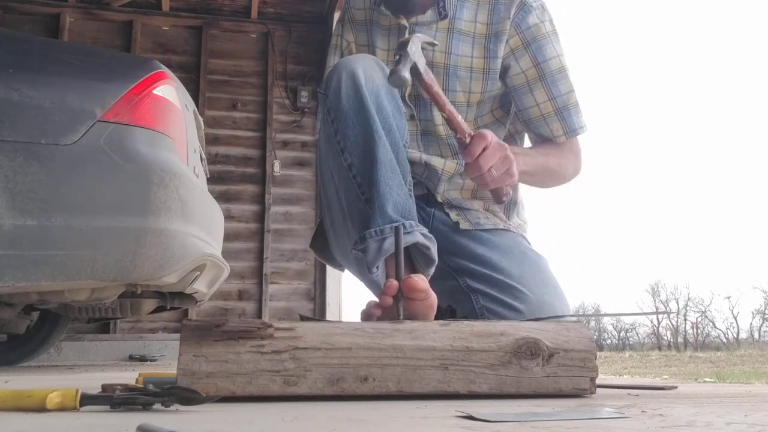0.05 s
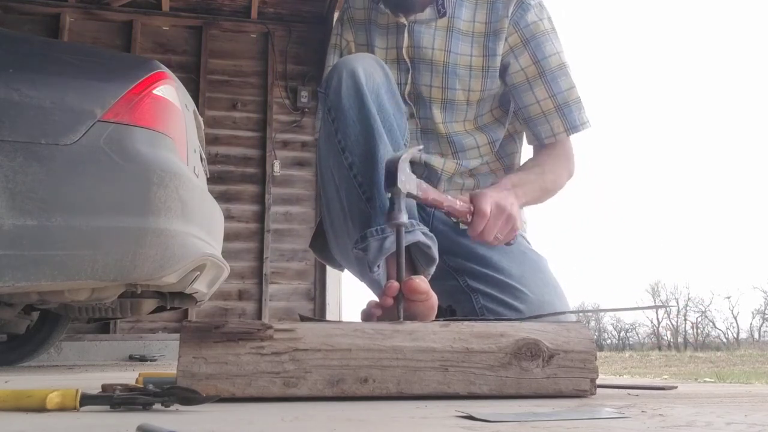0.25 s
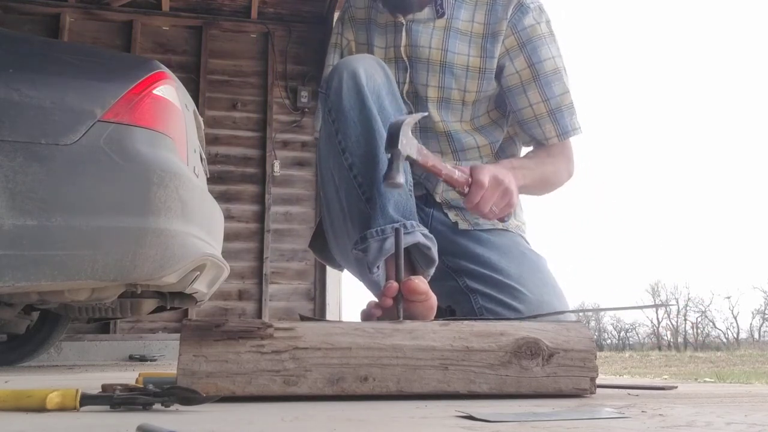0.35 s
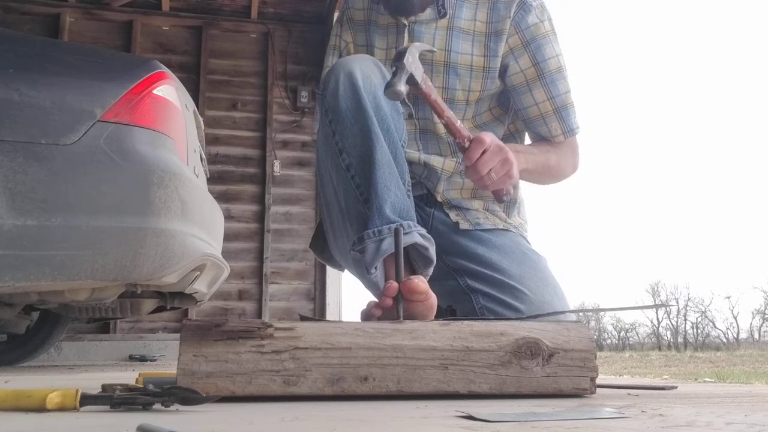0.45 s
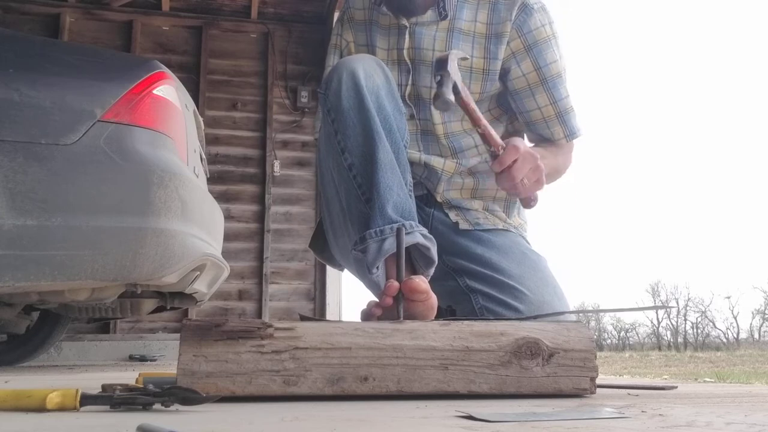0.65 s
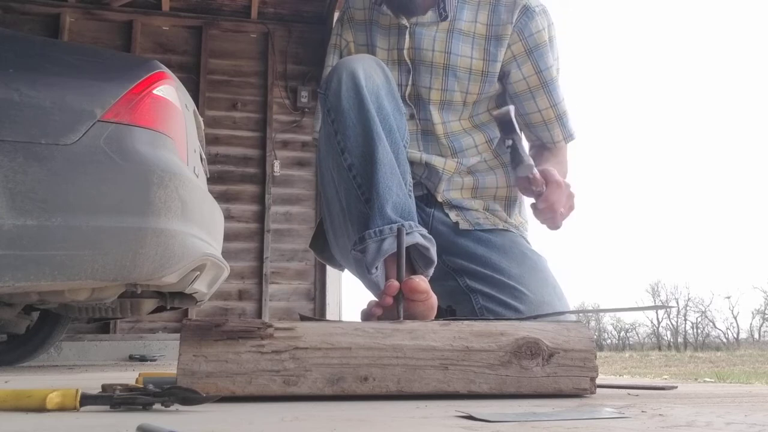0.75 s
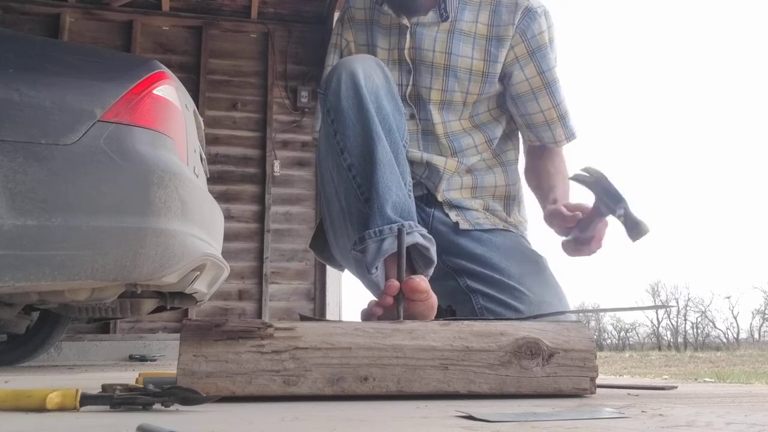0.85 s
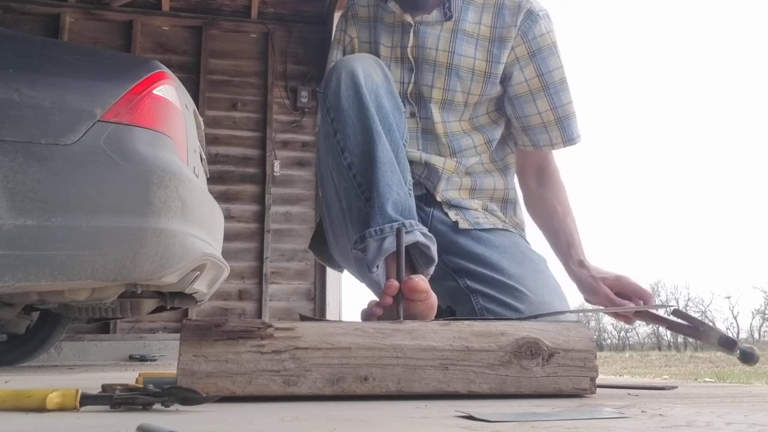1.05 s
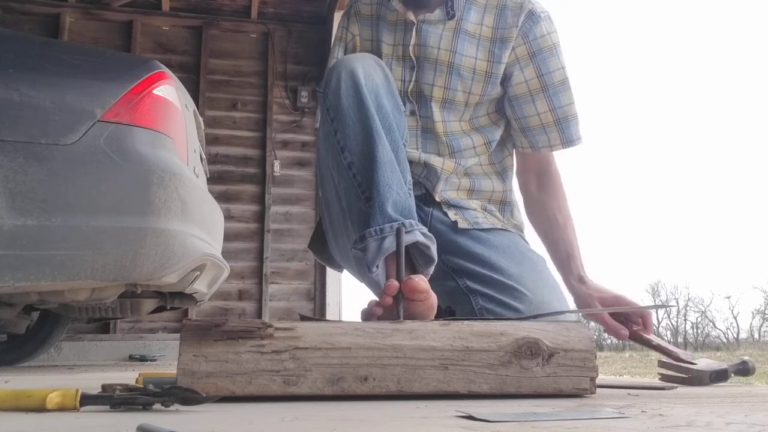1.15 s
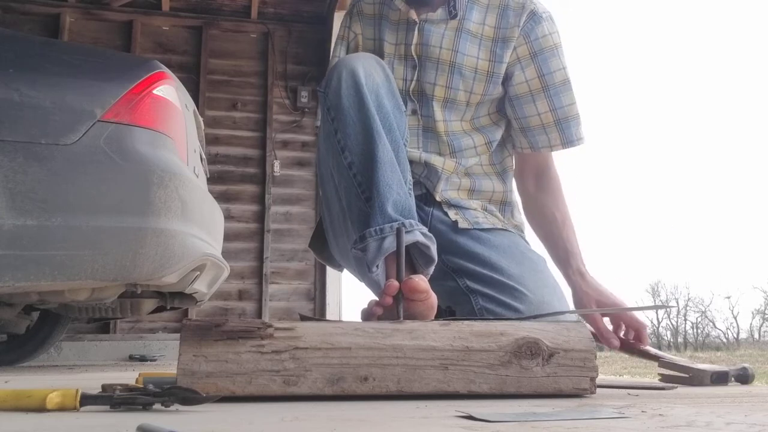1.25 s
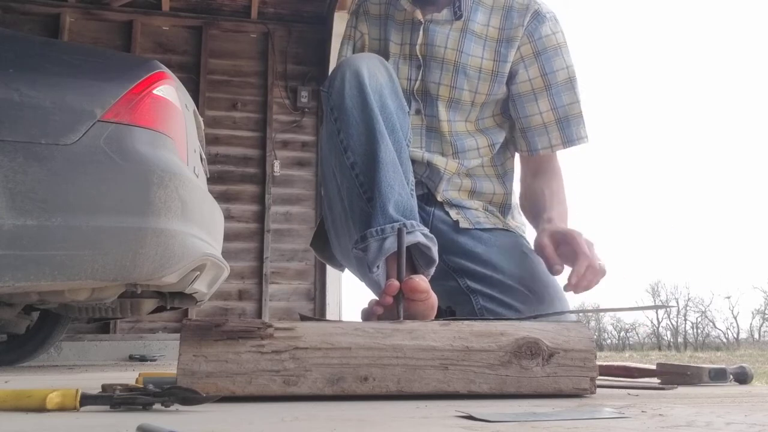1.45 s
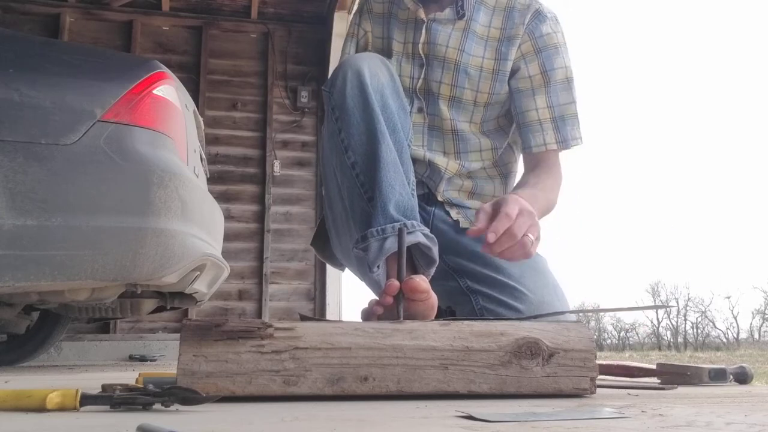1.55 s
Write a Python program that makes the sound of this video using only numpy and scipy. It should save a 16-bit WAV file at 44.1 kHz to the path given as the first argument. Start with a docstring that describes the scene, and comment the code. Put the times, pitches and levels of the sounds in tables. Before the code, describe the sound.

A hammer cracks sharply on a steel punch, rings briefly, then clanks down on concrete.

```python
"""The tail of one hammer blow dies over a low wavering hum; then a second blow cracks on a steel punch.
The punch stands on a thin plate over a timber: contact pulses excite steel modes, and shaped noise is
the reverberation of an open wooden garage. One high sine lingers as a thin ring.
Then the hammer is laid on the concrete floor, where it clanks and rocks to rest: a series of contacts,
each mixing dull knock, clank, head ring and tick. Rumble and hiss are noise; the hum is two sines."""
import sys
import numpy as np
from scipy import signal
from scipy.fft import rfft, irfft
from scipy.io import wavfile

SR = 44100
rng = np.random.default_rng(int(sys.argv[2]) if len(sys.argv) > 2 else 0)


def output_pcm(signal):
    """Save a mono or channel-first signal as 16-bit PCM at the path in sys.argv[1].

    Samples are clipped to [-1, 1] before scaling.
    """
    pcm = np.clip(np.atleast_2d(signal).T, -1, 1) * 32767
    wavfile.write(sys.argv[1], SR, np.round(pcm).astype(np.int16))


N = 70560  # 1.6 s


def undb(db):
    """Decibels to gain."""
    return 10 ** (np.asarray(db) / 20)


def unit(x):
    """Scale to unit energy per channel."""
    return x / np.sqrt(np.sum(x ** 2, axis=-1, keepdims=True))


def over_hz(hz, points):
    """Read a table on a log-frequency axis."""
    f, v = np.array(points, float).T
    return np.interp(np.log(hz + 1e-9), np.log(f), v)


def over_time(rows):
    """Each column of a curve table, sample by sample."""
    rows = np.array(rows, float)
    t = np.arange(N) / SR
    return [np.interp(t, rows[:, 0], column) for column in rows.T[1:]]


def click(spectrum):
    """Minimum-phase pulse: its energy comes as early as the given spectrum allows."""
    size = 4096
    cepstrum = irfft(np.log(undb(over_hz(np.fft.rfftfreq(size, 1 / SR), spectrum))))
    # Fold the second half onto the first, so nothing sounds before the contact
    cepstrum[1:size // 2] *= 2
    cepstrum[size // 2 + 1:] = 0
    return irfft(np.exp(rfft(cepstrum)))


def through(x, response):
    """Pass a sound through a response by convolution."""
    return signal.fftconvolve(np.atleast_2d(x), np.atleast_2d(response), axes=-1)[:, :N]


def later(x, s, size=N):
    """Place a sound at time s in a silence; a negative time leaves only its tail."""
    k = int(round(s * SR))
    padded = np.pad(np.atleast_2d(x), ((0, 0), (max(k, 0), size)))
    return padded[:, max(-k, 0):][:, :size]


RESPONSE_S = 0.9  # length of every ring and room response


def age():
    """Seconds since a contact, for as long as anything rings."""
    return np.arange(int(RESPONSE_S * SR)) / SR


def crack(spectrum):
    """A contact pulse with unit energy."""
    return unit(later(click(spectrum), 0, size=len(age()))[0])


def ring(modes, rise_s):
    """Struck modes decay exponentially, alternating in sign, with unit energy in all."""
    t = age()
    out = 0
    for k, (hz, db, t60) in enumerate(modes):
        mode = np.cos(2 * np.pi * hz * t) * np.exp(-np.log(1000) * t / t60)
        out = out + (-1) ** k * undb(db) * unit(mode)
    return unit(out * (1 - np.exp(-t / rise_s)))


# Likeness of left and right. Each row: frequency in Hz, correlation from 0 to 1.
STEREO_LIKENESS = [(40, 0.79), (90, 0.65), (250, 0.97), (600, 0.75), (1200, 0.21), (8000, 0)]


def stereo_noise(size=N):
    """White noise whose shared and opposed parts make it alike left and right in the bass."""
    likeness = np.clip(over_hz(np.fft.rfftfreq(size, 1 / SR), STEREO_LIKENESS), -.99, .99)
    mid, side = rfft(rng.standard_normal((2, size)))
    shared = mid * np.sqrt((1 + likeness) / 2)
    opposed = np.array([[1], [-1]]) * side * np.sqrt((1 - likeness) / 2)
    return irfft(shared + opposed, size)


def near(length_s, order=1):
    """A few milliseconds of scatter; a higher order ends it more abruptly."""
    t = age()
    fade = np.exp(-np.minimum(t / length_s, 20) ** order)
    return unit(stereo_noise(size=len(t)) * fade)


# Garage reverberation. Each row: band centre in Hz, time to fall 60 dB in seconds.
ROOM_DECAY = [(60, 1), (170, 0.55), (450, 0.4), (2000, 0.33), (6000, 0.32), (10000, .29), (16000, 0.16)]
ROOM_RISE_S, ROOM_HOLD_S = 0.0034, 0.036


def garage():
    """Diffuse reflections build up, hold, then die faster in the treble."""
    t = age()
    f = np.fft.rfftfreq(len(t), 1 / SR)
    noise = rfft(stereo_noise(size=len(t)))
    out = 0
    # Each band's share is 1 at its own centre and 0 at the others
    for share, (hz, t60) in zip(np.eye(len(ROOM_DECAY)), ROOM_DECAY):
        band_shape = [(row[0], s) for row, s in zip(ROOM_DECAY, share)]
        band = irfft(noise * over_hz(f, band_shape), len(t))
        out = out + band * np.exp(-np.log(1000) * np.maximum(t - ROOM_HOLD_S, 0) / t60)
    return unit(out * (1 - np.exp(-t / ROOM_RISE_S)))


def lean(x, right):
    """Tilt a sound between the microphones: half the difference on each side."""
    sides = [click([(hz, side * db / 2) for hz, db in right]) for side in (-1, 1)]
    return through(x, np.array(sides))


# Colour of the rumble. Each row: frequency in Hz, relative spectral level in dB.
RUMBLE_COLOUR = [(25, -2.5), (70, 1.5), (200, -5), (400, -22.5), (800, -36), (3000, -42.5), (15000, -49.5)]
# Loudness of the rumble. Each row: time in seconds, level in dB.
RUMBLE_LEVEL = [(0, -58), (.22, -59), (.55, -68), (1.05, -71.5), (1.6, -63)]
# Loudness of the hiss. Each row: time in seconds, level in dB.
HISS_LEVEL = [(0, -86.5), (.22, -74), (.6, -87), (1.05, -93), (1.6, -84.5)]


def air():
    """Faint outdoor rumble and hiss, as noise; both sink after the blow and then come back."""
    rumble_db, = over_time(RUMBLE_LEVEL)
    hiss_db, = over_time(HISS_LEVEL)
    rumble = through(stereo_noise(), unit(click(RUMBLE_COLOUR)))
    return undb(rumble_db) * rumble + undb(hiss_db) * stereo_noise()


# Path of the hum. Each row: time in seconds, pitch in Hz, fundamental level in dB, octave level in dB.
HUM_PATH = [(0, 90.3, -41.5, -60), (.15, 85.8, -44.5, -56.5), (.22, 85.1, -41, -72),
            (.33, 80.45, -63, -58.5), (.53, 80.35, -55.5, -63.5), (.8, 79.43, -58, -67),
            (1.06, 80.3, -59, -65.5), (1.19, 84.25, -67.5, -75.5), (1.32, 83, -56.5, -76.5),
            (1.44, 87.9, -49, -69), (1.56, 86.5, -45.5, -66), (1.6, 86.5, -47.5, -81)]


def hum():
    """A low, nearly pure hum, sine plus octave, that wavers in pitch and level."""
    hz, first_db, octave_db = over_time(HUM_PATH)
    phase = 2 * np.pi * np.cumsum(hz) / SR
    first = undb(first_db) * np.sin(phase)
    octave = undb(octave_db) * np.sin(2 * phase)
    return np.sqrt(2) * (first + octave)  # the table gives RMS levels


# Swell of the thin steel ring. Each row: time in seconds, level in dB before the trim.
THIN_SWELL = [(0, -63), (.035, -48.5), (.1, -73), (.2, -87.5), (.26, -38), (.46, -50), (.535, -72.5),
              (.59, -67.5), (.66, -60.5), (.72, -79.5), (.76, -85.5), (.81, -83.5), (.86, -105)]
THIN_HZ, THIN_TRIM_DB = 5910, -7.5


def thin_ring():
    """One faint high mode of the steel, a sine that swells and fades."""
    db, = over_time(THIN_SWELL)
    return undb(db + THIN_TRIM_DB) * np.sin(2 * np.pi * THIN_HZ * np.arange(N) / SR)


MIRROR_DB, SCATTER_DB = -5, -3  # clean and scattered parts of a wall echo
ECHO_SPREAD_S = 0.0078  # decay time of the scatter


def wall():
    """One wall echo: a clean reflection followed by scatter."""
    mirror = age() == 0
    return undb(MIRROR_DB) * mirror + undb(SCATTER_DB) * near(ECHO_SPREAD_S)


# Hammer touching the floor. Each row: start in seconds, then levels in dB of dull knock, clank,
# head ring, tick and the contact's send to the wall echoes.
FLOOR_CONTACTS = [(1.1044, -19, -27, -27, -39, 6.5), (1.124, -31.5, -38, -7, -43, -30),
                  (1.127, -7, -36, -10, -28.5, -3), (1.165, -32.5, -44, -25.5, -58, -23),
                  (1.218, -21.5, -28.5, -24, -46.5, -14.5), (1.2541, -16, -41, -15, -42, -2),
                  (1.3192, -16.5, 0, -3, -16.5, -2), (1.354, -19, -7.5, -16, -15.5, -16),
                  (1.452, -16.5, -11.5, -6.5, -28.5, 8), (1.536, -18, -25, -14.5, -32, 11),
                  (1.59, -21.5, -22.5, -36.5, -34, -4)]
# Dull knock of the handle. Each row: frequency in Hz, relative spectral level in dB.
HANDLE_KNOCK = [(30, -22.5), (100, -15), (190, -1), (500, 3.5), (900, 2), (1500, 7.5), (2000, -1.5),
                (2600, 0.5), (6000, -18), (15000, -48)]
# Clank of the steel head. Each row: frequency in Hz, relative spectral level in dB.
HEAD_CLANK = [(40, -27), (200, -13), (1000, -18), (2000, -7), (2900, 2.5), (3600, -6.5), (4300, 3),
              (4750, -5), (5150, 0.5), (5550, -9), (6700, -6), (7200, -14), (8000, -20), (12000, -24.5),
              (15800, -49)]
# Tick of grit. Each row: frequency in Hz, relative spectral level in dB.
GRIT_TICK = [(1000, -22), (6500, 13.5), (8400, 21), (10000, -9), (12900, -9.5), (13600, -10), (14200, -11),
             (15000, -36), (16000, -23)]
# Modes of the hammer head. Each row: frequency in Hz, relative level in dB, 60 dB decay in seconds.
HEAD_MODES = [(1322, 0, 0.096), (1341, -27, 0.095), (2560, -1.5, 0.29), (2621, 7.5, 0.11),
              (2697, 1.5, 0.14), (2740, -1, 0.26), (2975, -11.5, .12), (3690, -15.5, 0.48),
              (4235, -13.5, 0.18), (4310, -17, 0.067), (5020, -10.5, 0.083), (5220, -8, 0.17),
              (5920, -9, .22), (6600, -21.5, 0.17), (6800, -11, .3), (8250, -29.5, 0.18),
              (14140, -24, 0.044)]
# Right microphone against the left. Each row: frequency in Hz, difference in dB.
FLOOR_LEAN = [(100, 5.5), (700, -1.5), (1300, 3.5), (4400, -0.5), (8000, 0), (15000, 14)]
# Distinct wall echoes. Each row: delay in seconds, level in dB.
WALL_ECHOES = [(.011, 0.5), (0.0222, -2.5)]
# Colour of those echoes. Each row: frequency in Hz, gain in dB.
WALL_COLOUR = [(200, -9), (1400, -26), (2000, -7.5), (2650, -3), (3400, -4.5), (4300, -1.5), (7000, -21),
               (14000, -26)]
HEAD_RISE_S = 0.00023  # time for the modes to start
CHATTER_S, KNOCK_ROOM_DB = 0.0071, -2.5  # decay time of chatter in a contact; garage level


def hammer_laid_down():
    """Handle and head knock on the concrete; the head rings; walls answer each contact differently."""
    knock, clank, tick = crack(HANDLE_KNOCK), crack(HEAD_CLANK), crack(GRIT_TICK)
    head = ring(HEAD_MODES, HEAD_RISE_S)
    contacts, to_walls = 0, 0
    for s, knock_db, clank_db, ring_db, tick_db, echo_db in FLOOR_CONTACTS:
        dull = undb(knock_db) * knock
        steel = undb(clank_db) * clank + undb(ring_db) * head
        contact = later(dull + steel + undb(tick_db) * tick, s)
        contacts = contacts + contact
        to_walls = to_walls + undb(echo_db) * contact
    reflections = sum(undb(db) * later(wall(), s, size=SR // 10) for s, db in WALL_ECHOES)
    echoes = through(to_walls, through(reflections, click(WALL_COLOUR)))
    space = near(CHATTER_S) + undb(KNOCK_ROOM_DB) * garage()
    return lean(through(contacts, space) + echoes, FLOOR_LEAN)


# Blows on the punch, the first only a dying tail. Each row: start in seconds, level in dB.
PUNCH_BLOWS = [(-0.27, 14), (0.238, 13)]
# Crack of steel on steel. Each row: frequency in Hz, relative spectral level in dB.
STEEL_CRACK = [(50, -27.5), (160, 3), (400, -1), (900, -6.5), (1500, 0.5), (2400, 0.5), (4400, -4.5),
               (5300, 2), (6900, 3), (9500, 0.5), (15500, -8)]
# Modes of punch and plate. Each row: frequency in Hz, relative level in dB, 60 dB decay in seconds.
PUNCH_MODES = [(1435, -11, .24), (1526.5, -7.5, 0.18), (2074, -12, 0.069), (2180, -7, 0.29),
               (2356, -10.5, .09), (2886, -13, .17), (2997, -7, 0.18), (3870, -3, .11), (5187, -6, 0.11),
               (6450, -8.5, 0.13), (6740, -3.5, 0.25), (6790, -4, .19), (6940, -6.5, .2), (11805, -12, .12),
               (12435, -14.5, .14), (14565, -13, .12)]
# Right microphone against the left. Each row: frequency in Hz, difference in dB.
BLOW_LEAN = [(100, -1), (700, 1), (2400, 1.5), (4400, -2.5), (9000, 2.5), (15000, 5.5)]
PUNCH_RING_DB, PUNCH_RISE_S = -7, 0.0001  # ring against crack; time for the modes to start
BLOW_ROOM_DB, BLOW_NEAR_S = 3.5, 0.0051  # garage against near scatter; length of that scatter


def punch():
    """Each blow cracks, rings the modes of punch and plate, and fills the garage."""
    steel = crack(STEEL_CRACK) + undb(PUNCH_RING_DB) * ring(PUNCH_MODES, PUNCH_RISE_S)
    space = near(BLOW_NEAR_S, order=4) + undb(BLOW_ROOM_DB) * garage()
    blow = lean(through(steel, space), BLOW_LEAN)
    return sum(undb(db) * later(blow, s) for s, db in PUNCH_BLOWS)


def scene():
    """All sources at the two microphones."""
    return punch() + thin_ring() + hammer_laid_down() + hum() + air()


# Microphone colour. Each row: frequency in Hz, gain in dB.
MIC_COLOUR = [(100, -1), (7050, 3.5), (7350, -1.5), (8000, -14.5), (8300, -5.5), (9100, -1.5), (15000, 7.5)]
CEILING, TOP_HZ = 1.1, 15850  # amplitude that peaks bend towards; low-pass edge


def record(dry):
    """The microphone rounds the peaks, has a notch in the treble and cuts the top."""
    rounded = CEILING * np.tanh(dry / CEILING)
    coloured = through(rounded, click(MIC_COLOUR))
    top_cut = signal.ellip(10, .2, 80, TOP_HZ, fs=SR, output="sos")
    return signal.sosfilt(top_cut, coloured)


dry = scene()
out = record(dry)
output_pcm(out)
```